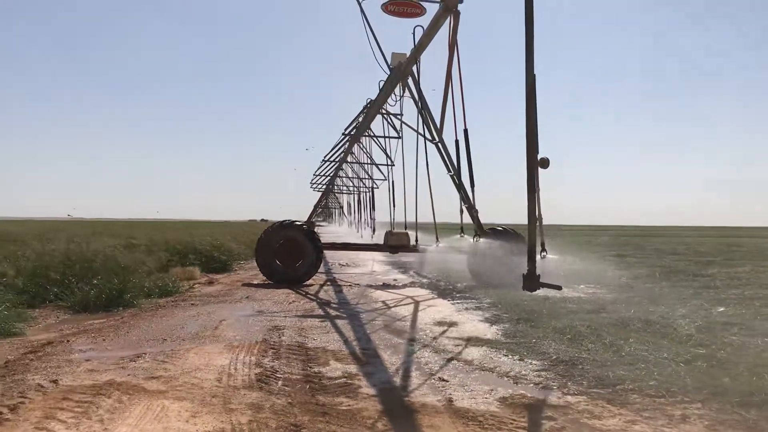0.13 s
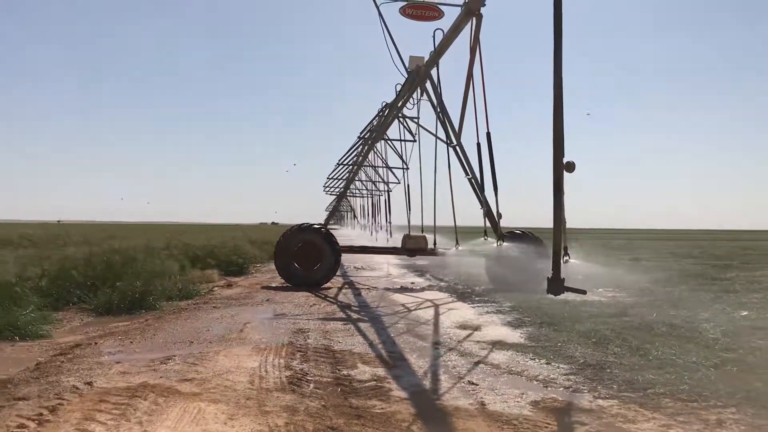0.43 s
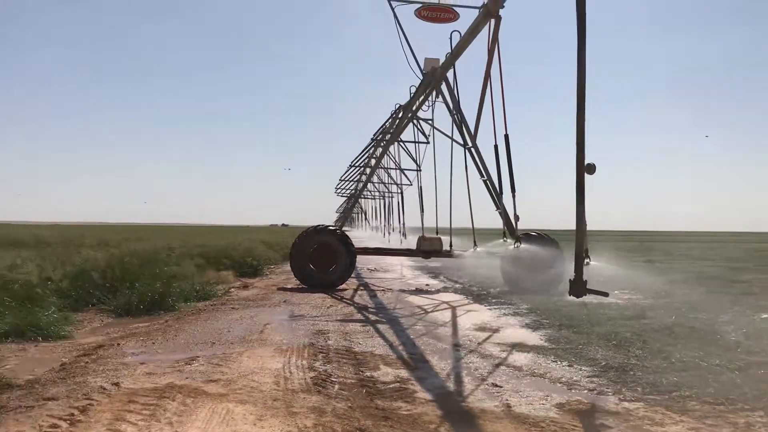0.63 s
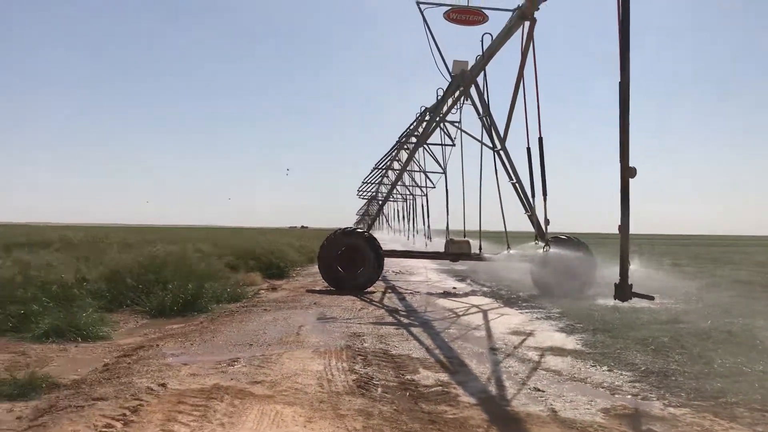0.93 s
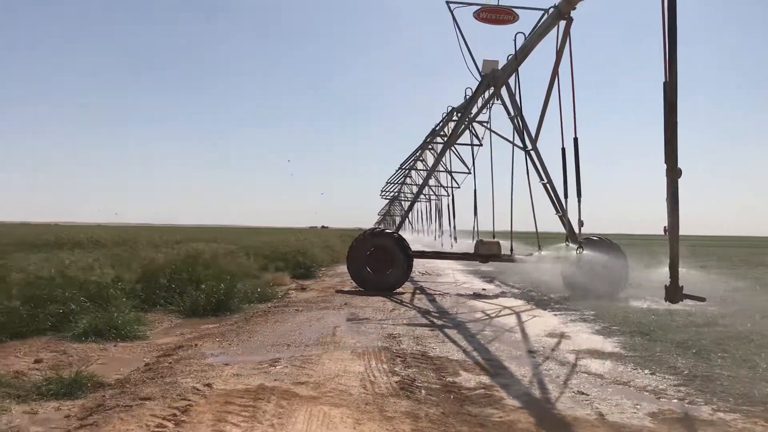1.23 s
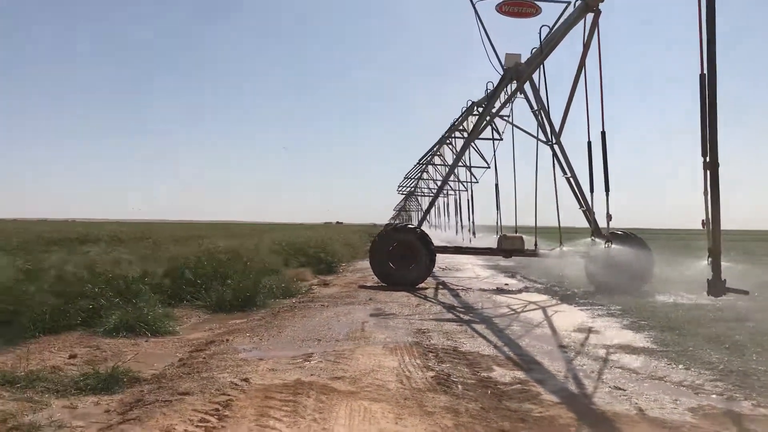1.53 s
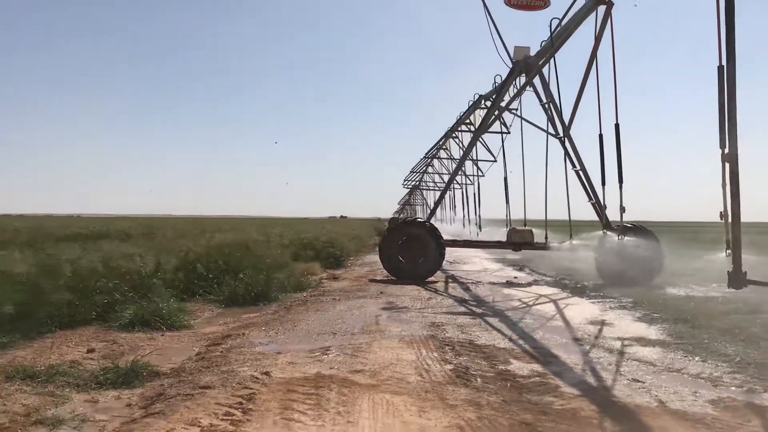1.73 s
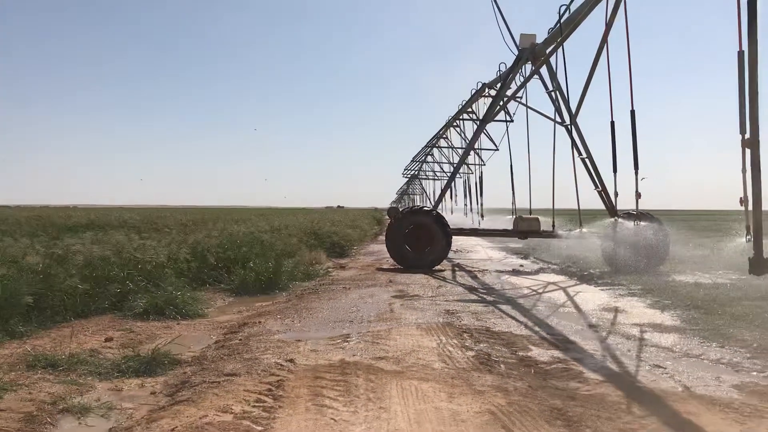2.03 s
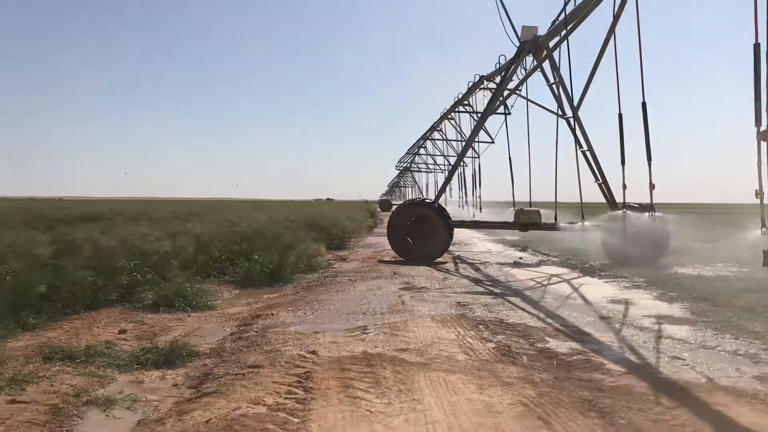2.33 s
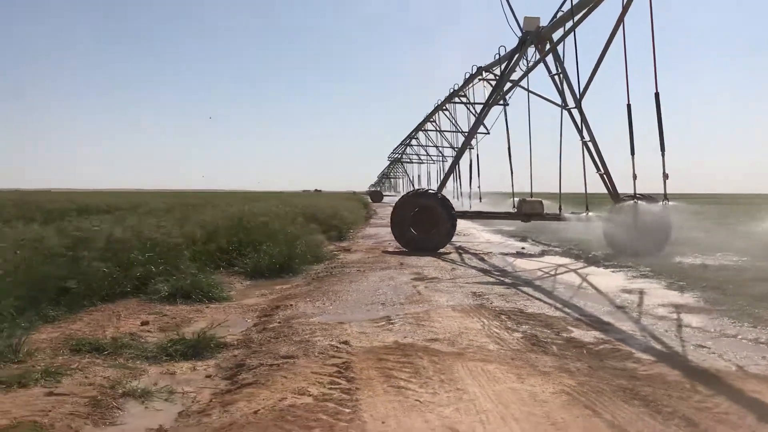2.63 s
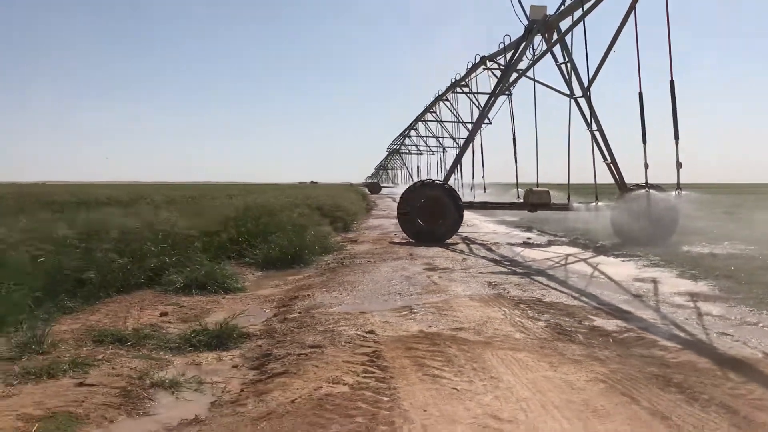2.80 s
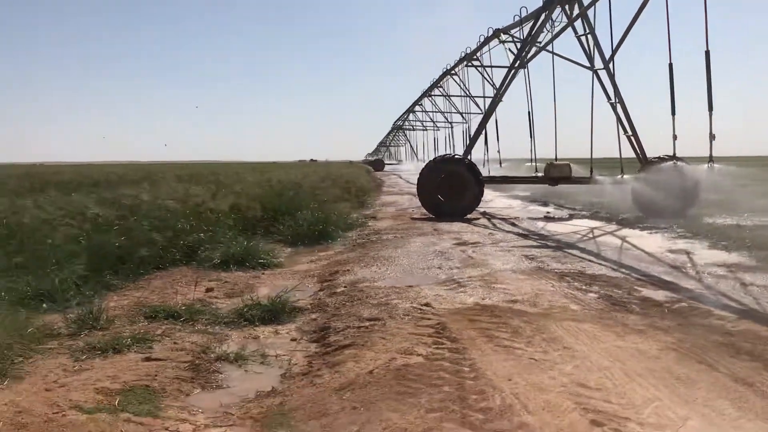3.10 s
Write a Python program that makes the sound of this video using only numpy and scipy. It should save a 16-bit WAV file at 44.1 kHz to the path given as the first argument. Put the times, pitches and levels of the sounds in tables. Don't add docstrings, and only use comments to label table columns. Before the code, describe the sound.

Buffeting wind on a hand-held microphone, with a field sprinkler hissing softly some metres away.

```python
import sys
import numpy as np
from scipy import signal
from scipy.fft import rfft, irfft, next_fast_len
from scipy.io import wavfile
from scipy.ndimage import uniform_filter1d

SR = 44100
rng = np.random.default_rng(int(sys.argv[2]) if len(sys.argv) > 2 else 0)


def store_wav(level_fs):
    pcm = np.round(np.clip(np.atleast_2d(level_fs), -1, 1) * 32767)
    wavfile.write(sys.argv[1], SR, pcm.T.astype(np.int16))


def decibels_to_gain(level_db):
    exponent = np.asarray(level_db, float) / 20
    return 10 ** exponent


N = 143766

# centre_s, level_db over the breeze, half_length_s, air_speed_db over calm
GUSTS = [(0.07, 7, 0.013, 9.5), (0.146, 14, 0.0088, 5.5), (.209, 4.5, 0.01, 6), (0.446, 2, 0.026, 3.5),
         (0.557, 3.5, 0.037, 0.5), (0.75, 10, .04, 10.5), (.81, 8.5, 0.009, 8.5),
         (1.018, 13.5, 0.044, 10.5), (1.072, 9.5, 0.0099, 7.5), (1.112, 6.5, 0.014, 5.5),
         (1.15, 9, 0.025, 6), (1.262, 4, 0.0096, 7), (1.328, 8, 0.039, 8.5), (1.55, 8, 0.031, 5.5),
         (1.6, 11, 0.03, 11), (1.676, 2.5, 0.015, 3.5), (1.78, 1, 0.017, 7), (1.872, 4.5, 0.032, 5),
         (1.957, 4, 0.018, 4.5), (2.053, 6, 0.03, 7.5), (2.138, 10, 0.023, 5), (2.184, 5.5, 0.017, 7),
         (2.244, 9.5, 0.017, 6), (2.298, 6, 0.019, 7), (2.376, 5.5, .012, 7), (2.436, 6.5, 0.016, 10),
         (2.55, 8, 0.0096, 5), (2.702, 13, 0.016, 8), (2.747, 8.5, 0.015, 7), (2.792, 9, 0.0087, 6.5)]
# time_s, level_db
BREEZE = [(0, -25), (.1, -25), (.5, -23), (.59, -24.5), (.635, -30), (.7, -21.5), (.9, -24), (1.2, -26),
          (1.47, -22), (1.7, -25), (1.9, -23), (2.3, -24.5), (2.5, -19.5), (2.6, -30), (2.7, -25.5),
          (3.0, -28), (3.26, -22.5)]
# freq_hz, density_db per Hz
EDDIES = [(15, -15), (40, 1.5), (90, -2.5), (150, -6), (260, -14), (420, -35), (650, -68), (1000, -72)]
# time_s, peak_db, lump_hz
SLAPS = [(.7285, -7.5, 507), (.743, -9, 257), (.996, -10.5, 486), (1.078, -9.5, 397), (1.335, -13, 473),
         (1.587, -11.5, 417), (2.4365, -4, 191), (2.4412, -6.5, 394), (2.710, -6, 493), (2.742, -15, 515),
         (2.794, -12.5, 260), (.074, -22, 520), (2.068, -19, 520), (2.134, -19.5, 430), (2.181, -19.5, 473),
         (2.374, -18, 413), (2.434, -18, 790), (1.301, -16, 378), (1.367, -19, 450)]
# time_s, mist_db, splash_db against mist
WAFTS = [(0.0, -43.5, 1), (.25, -44, 0), (.55, -43, 2), (.75, -44.5, 1.5), (.95, -45, 1), (1.25, -45, 0.5),
         (1.42, -43.5, -1), (1.6, -45, 0), (1.95, -45, -1.5), (2.1, -49.5, 1.5), (2.28, -45.5, 2.5),
         (2.47, -47.5, 0.5), (2.58, -43, -1), (2.8, -45, 1.5), (2.98, -44, 1.5), (3.05, -46.5, 2),
         (3.16, -44.5, 0.5), (3.26, -45.5, -2.5)]
# freq_hz, density_db per Hz
SPRAY_COLOUR = [(180, -20), (400, -4.5), (900, -17.5), (1500, -19), (2500, -22.5), (3700, -18.5),
                (7000, -19.5), (15700, -23)]
# freq_hz, share
MIST_SHARE = [(1500, 0.019), (4000, .1), (7000, 0.84), (9000, 1.13), (14000, 1.44)]
# freq_hz, share
SPLASH_SHARE = [(1500, 0.033), (2500, 0.14), (3500, 1), (6500, 0.71), (9000, 0.066)]
# end_s, depth_db, length_s
LULLS = [(0.172, 5, 0.08), (0.337, 3.5, .04), (0.424, 4, 0.023), (0.602, 3, 0.044), (0.883, 4, .07),
         (1.1, 5, 0.066), (1.21, 4, 0.041), (1.355, 5.5, 0.066), (1.66, 4.5, .04), (1.717, 4, 0.016),
         (1.823, 3.5, 0.074), (1.92, 2.5, 0.065), (2.053, 2.5, .06), (2.19, 1.5, 0.07), (2.4, 1, .05),
         (2.495, 3, .06), (2.853, 3, 0.033), (3.04, 1, 0.027), (3.12, 1.5, .03)]
# freq_hz, width_hz, gain_db
NOTCHES = [(5050, 300, -3.5), (7700, 480, -3), (10400, 490, -5.5), (14000, 330, 0.5)]
# time_s, level_db, pitch_hz, length_s
LARGE_DROP = (.9578, -26, 5700, .0004)
# pitch_hz, level_db, t60_s
PIPE_MODES = [(945, -5, .05), (1410, -6, 0.076), (2200, -10, .05)]


def evened(x):
    return x / np.sqrt(np.mean(x ** 2) + 1e-20)


def read(points, hz):
    f_hz, value = np.transpose(points)
    return np.interp(np.log(hz + 1), np.log(f_hz + 1), value)


def drift(t_s, low_hz, top_hz):
    total = 0
    for f_hz in np.geomspace(low_hz, top_hz, num=30):
        total = total + np.sin(2 * np.pi * (f_hz * t_s + rng.random())) / np.sqrt(f_hz)
    return evened(total)


def gusts(t_s):
    rise_share, squareness = 0.7, 1.92
    centre_s, level_db, half_s, speed_db = np.transpose(GUSTS)[:, :, None]
    u = (t_s - centre_s) / half_s
    skewed = np.where(u < 0, u / rise_share, u * rise_share)
    shape = np.exp(-abs(skewed) ** squareness)
    return (level_db * shape).max(0), (speed_db * shape).max(0)


def eddies(t_s, coarse_s, speed):
    steady, steady_cycles = 0.6, 5
    size = next_fast_len(N)
    hz = np.fft.rfftfreq(size, 1 / SR)
    noise = rfft(rng.standard_normal(size))
    out = np.zeros(N)
    for centre_hz in 20 * np.sqrt(2) ** np.arange(16):
        octaves = np.log2((hz + 1) / centre_hz)
        share = np.cos(np.pi * np.clip(octaves, -0.5, 0.5)) ** 2
        band = irfft(noise * share, size)[:N]
        power = uniform_filter1d(band ** 2, round(steady_cycles * SR / centre_hz)) / np.mean(band ** 2)
        band = band / (abs(power) + 0.1) ** (steady / 2)
        gain = decibels_to_gain(read(EDDIES, centre_hz / speed)) / np.sqrt(speed)
        out += band * np.interp(t_s, coarse_s, gain)
    calm_rms = np.sqrt(np.mean(decibels_to_gain(2 * read(EDDIES, hz))))
    return out / calm_rms


def wavelet(t_s, hz):
    u = (np.pi * hz * t_s) ** 2
    return (1 - 2 * u) * np.exp(-u)


def slaps(t_s):
    slap_db = -2.5
    out = np.zeros(N)
    for k, (at_s, peak_db, lump_hz) in enumerate(SLAPS):
        lump = wavelet(np.clip(t_s - at_s, -0.05, 0.05), lump_hz)
        out += (-1) ** k * decibels_to_gain(peak_db + slap_db) * lump
    return out


def wind():
    eddy_db, ragged_db, flutter_db, flutter_top_hz = -3.5, 2, 1.5, 110.2
    t_s = np.arange(N) / SR
    coarse_s = t_s[::16]
    gust_db, speed_db = gusts(coarse_s)
    speed = decibels_to_gain(speed_db + flutter_db * drift(coarse_s, 8, flutter_top_hz))
    rumble = eddies(t_s, coarse_s, speed)
    breeze_db = np.interp(coarse_s, *np.transpose(BREEZE))
    level_db = breeze_db + eddy_db + gust_db + ragged_db * drift(coarse_s, 15, 160)
    return rumble * np.interp(t_s, coarse_s, decibels_to_gain(level_db)) + slaps(t_s)


def drops():
    drops_per_s, spread_db = 1500, 5
    out, t_s = np.zeros(N), np.arange(200) / SR
    size_db = spread_db * np.minimum(rng.exponential(1, N), 4)
    size = decibels_to_gain(size_db) * (rng.random(N) < drops_per_s / SR)
    kind = rng.integers(0, 24, N)
    for k, hz in enumerate(np.geomspace(2500, 15000, num=24)):
        cycles = t_s * hz
        grain = np.sin(2 * np.pi * hz * t_s) * cycles * np.exp(-cycles / 1.23)
        out += signal.oaconvolve(size * (kind == k), grain * hz)[:N]
    return evened(out)


def spray_motion_db(t_s, hz, shape):
    patch_db, flicker_db = 0.98, 0.8
    lull_end_s, lull_from_hz, lull_octaves = 0.0092, 4300, 1.05
    near_s, near_db_per_s, near_hz = 2.63, 5, 2080

    patches = uniform_filter1d(rng.standard_normal(shape), size=12, axis=0)
    patches = evened(uniform_filter1d(patches, size=16, axis=1))
    waft_s, mist_db, splash_db = np.transpose(WAFTS)
    waft_db = np.interp(t_s, waft_s, mist_db)
    body_db = np.interp(t_s, waft_s, mist_db + splash_db)
    moving_db = read(MIST_SHARE, hz) * (waft_db - waft_db.mean()) + patch_db * patches
    moving_db += read(SPLASH_SHARE, hz) * (body_db - body_db.mean())

    blown_db = 0
    for end_s, depth_db, length_s in LULLS:
        span_s = np.where(t_s < end_s, length_s, lull_end_s)
        blown_db = blown_db + depth_db * np.exp(-((t_s - end_s) / span_s) ** 2)
    moving_db -= np.clip(np.log2((hz + 1) / lull_from_hz) / lull_octaves, 0, 1) * blown_db

    near_share = np.exp(-np.log((hz + 1) / near_hz) ** 2 / 0.079)
    moving_db += near_share * near_db_per_s * np.maximum(t_s - near_s, 0)

    blend = np.clip(np.log2((hz + 1) / 4500), 0, 1.5) / 0.84
    flicker = blend * drift(t_s, 6.5, 50) + 0.31 * (1 - blend) * drift(t_s, 6, 50)
    return moving_db + flicker_db * flicker, waft_db.mean()


def spray():
    spray_db, drops_db = 6, -9
    source = rng.standard_normal(N) + decibels_to_gain(drops_db) * drops()
    hz, t_s, z = signal.stft(source, SR, nperseg=512, noverlap=384)
    z = z / np.sqrt(uniform_filter1d((abs(z) ** 2).mean(1), size=9))[:, None]
    notch_db = sum(db * np.exp(-((hz - f_hz) / width_hz) ** 2) for f_hz, width_hz, db in NOTCHES)
    colour = decibels_to_gain(read(SPRAY_COLOUR, hz) + notch_db)[:, None]
    moving_db, mean_db = spray_motion_db(t_s, hz[:, None], z.shape)
    hiss = signal.istft(z * colour * decibels_to_gain(moving_db), SR, nperseg=512, noverlap=384)[1][:N]
    return decibels_to_gain(spray_db + mean_db) * evened(hiss)


def large_drop():
    at_s, level_db, pitch_hz, length_s = LARGE_DROP
    u_s = np.arange(N) / SR - at_s
    return decibels_to_gain(level_db) * np.cos(2 * np.pi * pitch_hz * u_s) * np.exp(-(u_s / length_s) ** 2 * 4)


def pipe_tap():
    tap_s, tap_db = 3.104, -33
    u_s = np.maximum(np.arange(N) / SR - tap_s, 0)
    out = np.zeros(N)
    for pitch_hz, level_db, t60_s in PIPE_MODES:
        out += decibels_to_gain(tap_db + level_db - 60 * u_s / t60_s) * np.sin(2 * np.pi * pitch_hz * u_s)
    return out


def scene():
    return (wind() + spray() + large_drop() + pipe_tap())[None]


def top_cut(x):
    return signal.sosfilt(signal.butter(12, 15790, fs=SR, output="sos"), x)


def record(dry):
    bass_cut_hz, edge_hz = 44.3, 15720
    bass_cut = signal.butter(2, bass_cut_hz, "high", fs=SR, output="sos")
    band_limit = signal.firwin(1023, edge_hz, window=("kaiser", 9), fs=SR)
    mix = signal.sosfilt(bass_cut, dry)
    mix = signal.oaconvolve(mix, band_limit[None], "same")
    return top_cut(mix)


dry = scene()
out = record(dry)
store_wav(out)
```